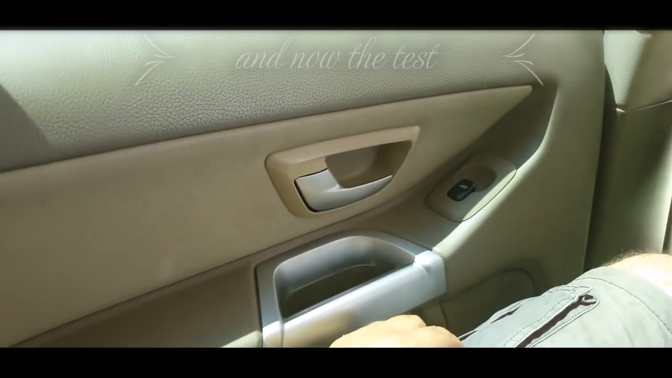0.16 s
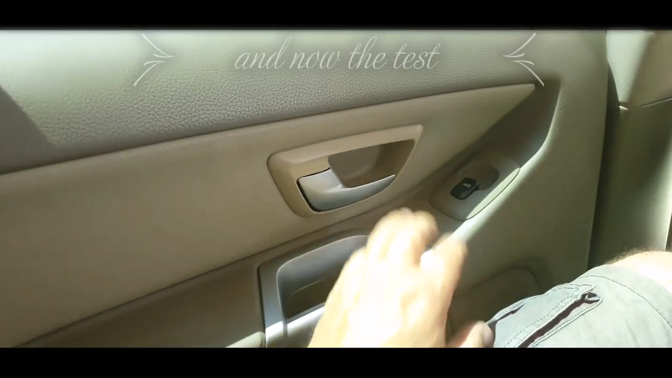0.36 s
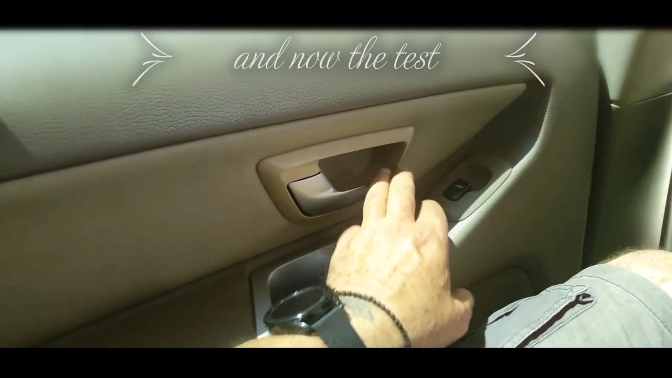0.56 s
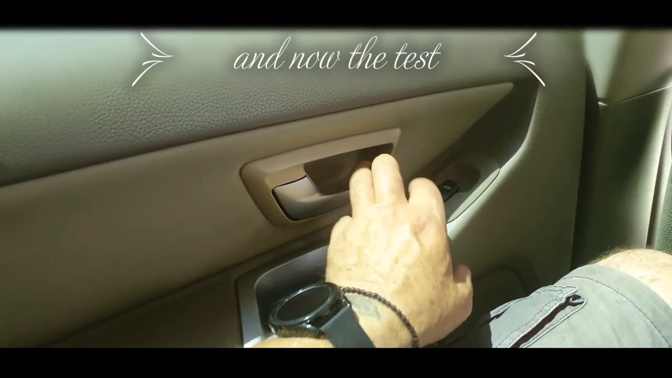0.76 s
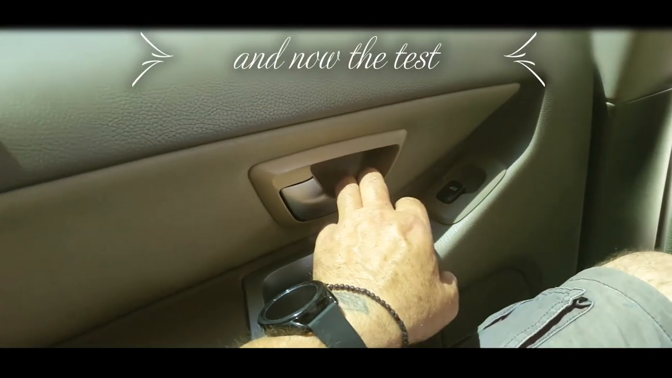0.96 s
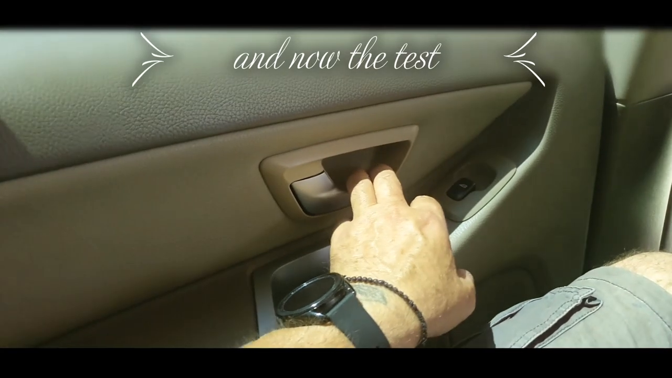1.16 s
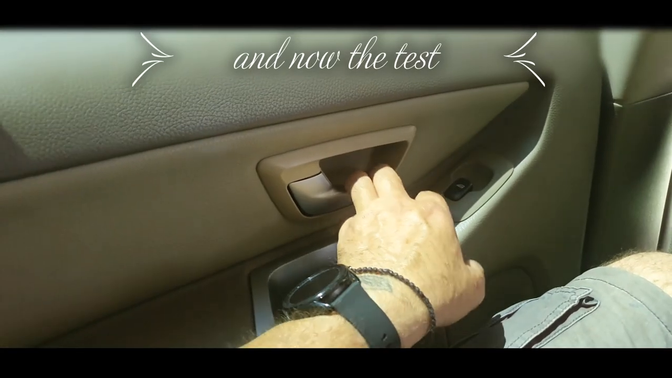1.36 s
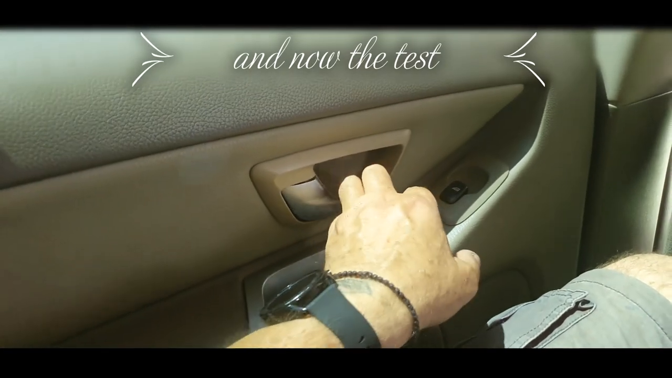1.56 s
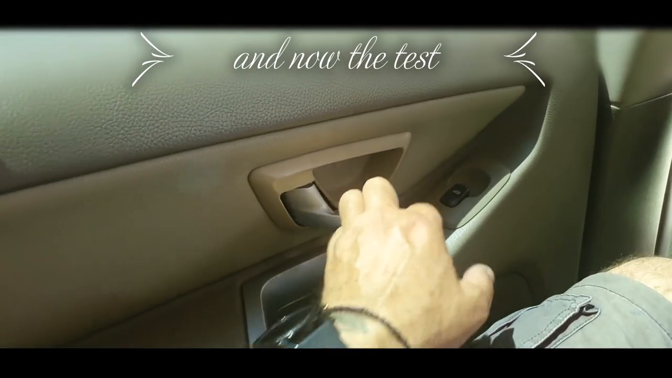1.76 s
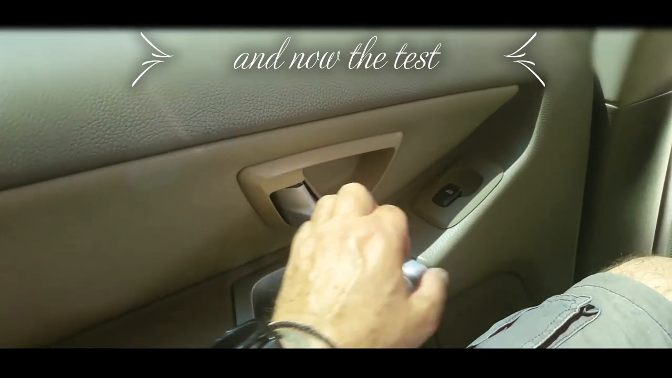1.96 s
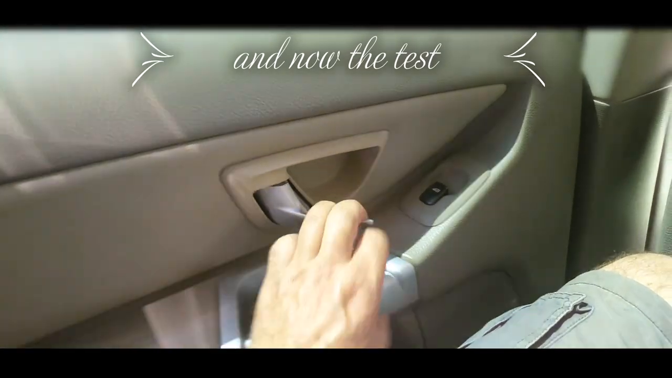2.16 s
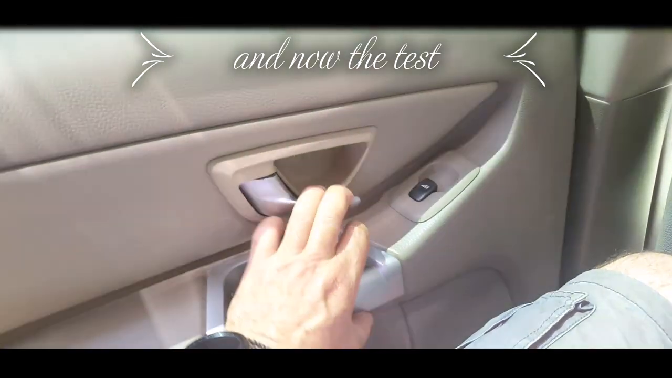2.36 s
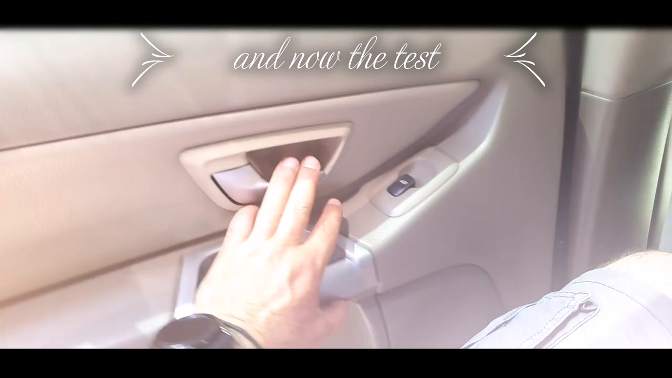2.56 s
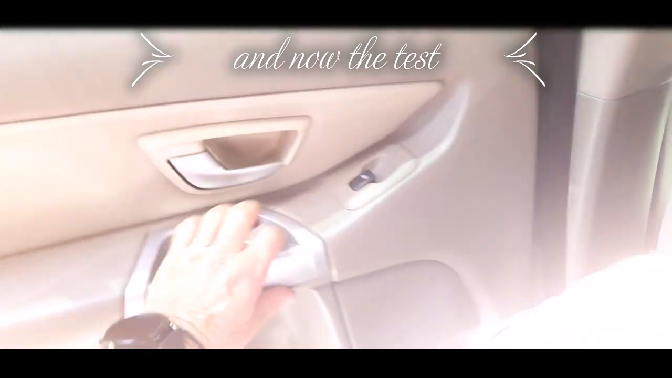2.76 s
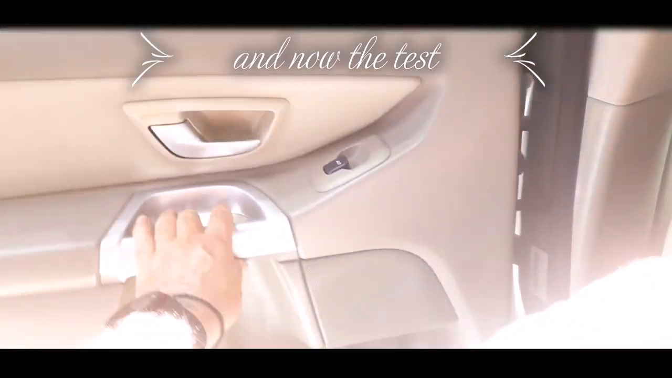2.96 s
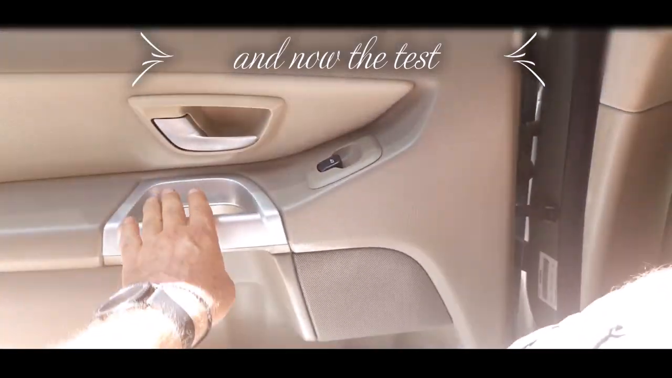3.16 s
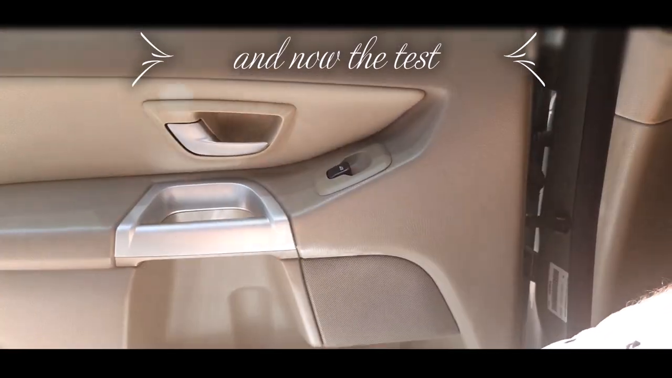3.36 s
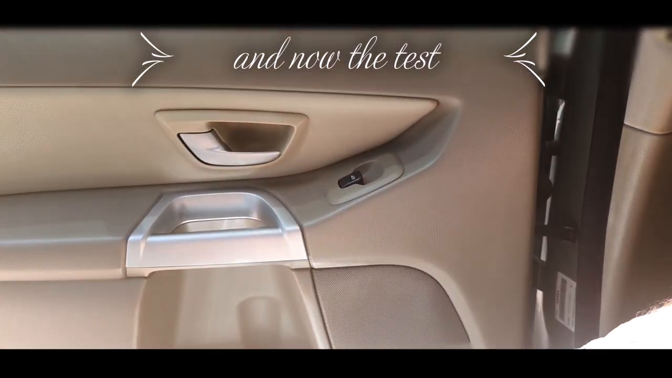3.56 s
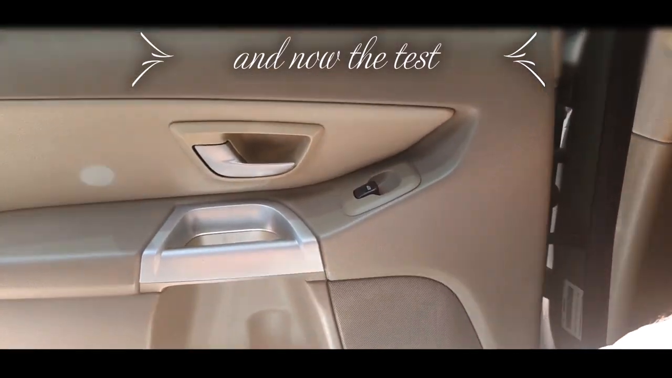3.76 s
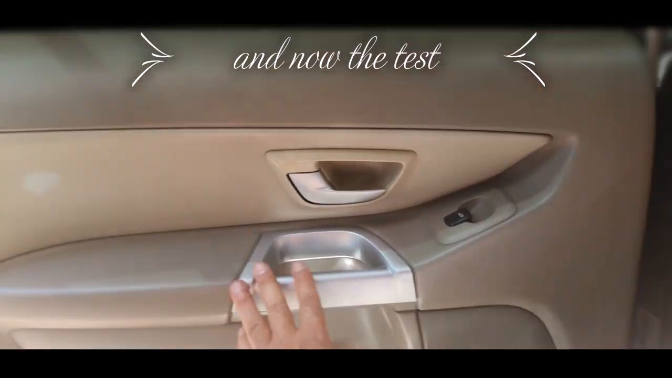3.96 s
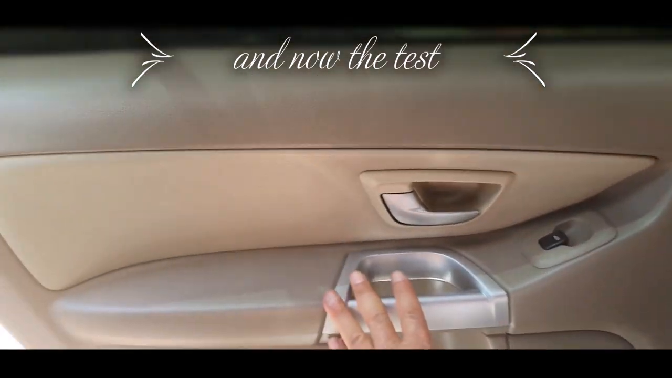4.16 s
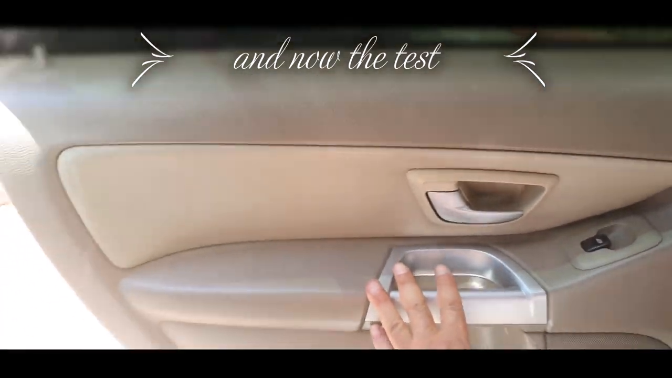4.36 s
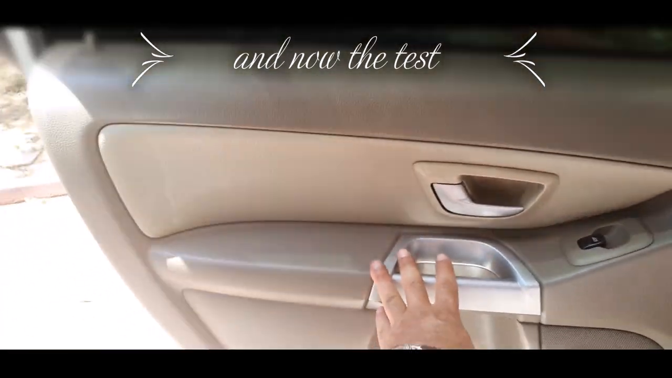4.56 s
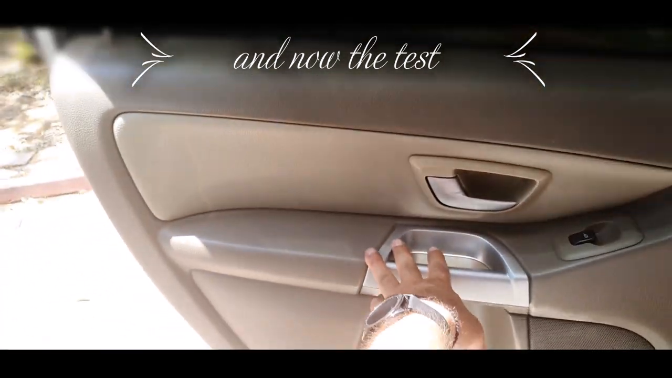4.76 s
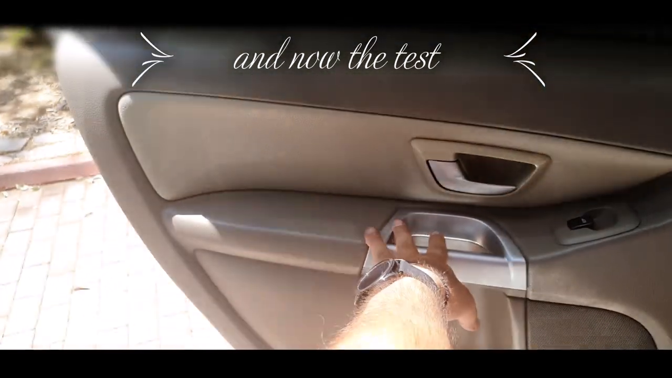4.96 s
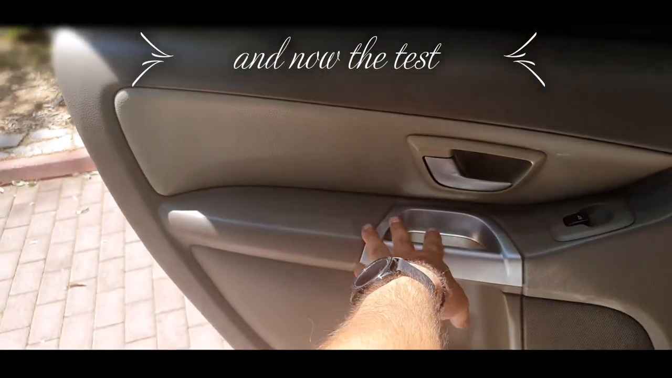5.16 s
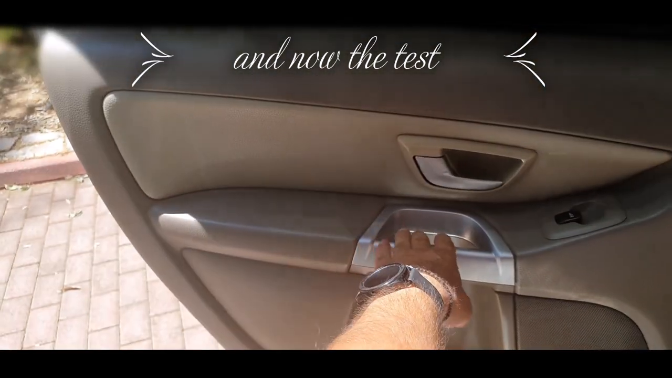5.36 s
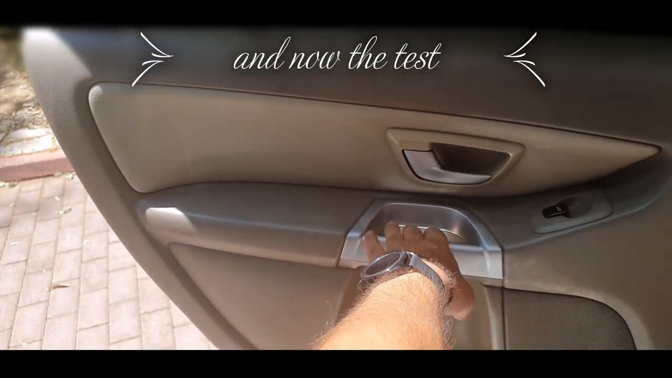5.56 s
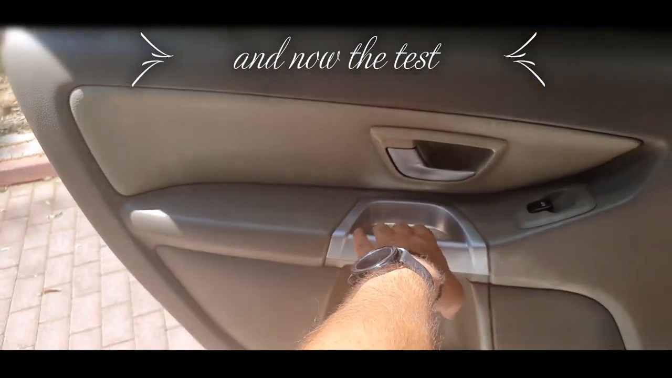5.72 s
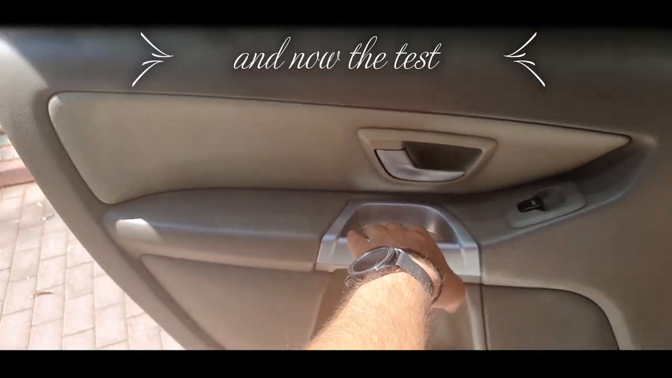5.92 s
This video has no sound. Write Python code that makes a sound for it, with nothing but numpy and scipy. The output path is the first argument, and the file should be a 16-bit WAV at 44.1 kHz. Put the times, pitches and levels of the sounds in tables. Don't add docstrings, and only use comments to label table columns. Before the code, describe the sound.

Close stereo microphones inside a quiet, padded parked car. Fingers tap the handle softly, then a burst of stiff plastic and metal clicks leads to a deep, loud latch thump. The handle snaps back with a clack and low knock; cloth and seal rustle. The door swings out, faint street air and distant cicadas seep in, a dull boom marks its stop, and a sharp bright clack ends it.

```python
import sys
import numpy as np
from scipy import signal
from scipy.io import wavfile
from scipy.ndimage import uniform_filter1d

SR = 44100
rng = np.random.default_rng(int(sys.argv[2]) if len(sys.argv) > 2 else 0)


def inscribe(sig):
    pcm = np.round(np.clip(np.atleast_2d(sig).T, -1, 1) * 32767)
    wavfile.write(sys.argv[1], SR, pcm.astype(np.int16))


def undo_db(level):
    steps = np.asarray(level, float) / 20
    return 10 ** steps


N = 268569

# frequency in Hz, left-right correlation from -1 to 1.
LIKENESS = [(60, 0.86), (150, 0.94), (380, 0.81), (950, 0.21), (2380, -0.052), (5980, 0.055), (15000, 0.2)]


def evened(x):
    return x / np.sqrt(np.mean(x ** 2) + 1e-20)


def read(points, hz):
    f, value = np.transpose(points)
    return np.interp(np.log(hz + 1), np.log(f + 1), value)


def add(mix, s, sound):
    part = mix[:, round(s * SR):][:, :sound.shape[1]]
    part += sound[:, :part.shape[1]]


def wash(spectrum, level_db, patchy_db, flicker_db, balance_db, size=512):
    hop = size // 4
    frames, hz = N // hop + 5, np.fft.rfftfreq(size, 1 / SR)
    a, b, c, d, patches = rng.standard_normal((frames, len(hz), 5)).T
    patches = uniform_filter1d(patches, size=6, axis=0)
    patches = evened(uniform_filter1d(patches, size=16, axis=1))
    flicker = evened(uniform_filter1d(rng.standard_normal(frames), size=6))
    same = np.clip(read(LIKENESS, hz), -1, 1)[:, None]
    left = a + 1j * b
    right = same * left + np.sqrt(1 - same ** 2) * (c + 1j * d)
    z = np.array([left, right])
    z *= undo_db(read(spectrum, hz)[:, None] + patchy_db * patches + flicker_db * flicker)
    x = signal.istft(z, nperseg=size, noverlap=size - hop)[1][:, :N]
    return x / np.std(x.mean(0)) * undo_db(level_db + balance_db * np.array([[.5], [-.5]]))


def door_opening():
    # time in seconds, opening from 0 shut to 1 wide.
    swing_path = [(0, 0.053), (1.7, 0), (2.0, 0.061), (2.24, 0.2), (2.56, 0.55), (2.88, 0.7), (3.26, 0.89),
                  (3.53, 1.08), (4.1, 1.07), (4.3, 0.89), (4.8, 0.99), (5.68, 0.99), (5.82, 1.06),
                  (6.09, 1.03)]
    return np.interp(np.arange(N) / SR, *np.transpose(swing_path))


def shaking():
    # start in seconds, hold in seconds, shake in dB, buzz in dB against the shake.
    jolts = [(0.262, 0.025, -74.5, 4), (0.552, 0.17, -51, -21), (1.358, 0.079, -57, -22),
             (1.49, 0.23, -43.5, -28), (1.605, 0.066, -61, 9), (1.759, 0.047, -36, -21),
             (2.224, 0.065, -52.5, -16), (2.334, 0.21, -55, -16), (2.382, 0.018, -60.5, 5),
             (2.828, 0.043, -52.5, -8.5), (3.326, 0.18, -62, -5), (3.84, 0.19, -58, -2.5),
             (4.05, 0.037, -53, -6), (4.614, 0.075, -49.5, -15.5), (5.303, 0.22, -49, -12),
             (5.6, .18, -56, 1), (4.393, 0.058, -55, -11.5), (5.0, .1, -55, -20), (5.9, .2, -53, -14),
             (0.758, 0.069, -66, -30), (1.0, 0.042, -81.5, 4.5)]
    rise_s, fall_db_per_s = 0.036, 129
    t, shake, buzz = np.arange(N) / SR, 0, 0
    for start, hold, db, buzz_db in jolts:
        since = t - start - rise_s
        fade = undo_db(db - fall_db_per_s * np.maximum(since - hold, 0))
        jolt = np.clip(1 + since / rise_s, 0, 1) * fade
        shake, buzz = np.hypot(shake, jolt), np.hypot(buzz, undo_db(buzz_db) * jolt)
    return shake, buzz


def rumble_and_street(opening):
    # frequency in Hz, level in dB per Hz.
    rumble_spectrum = [(12, -40), (20, -11.5), (81, 5.5), (118, -5), (155, 3.5), (204, -5.5), (226, -21.5),
                       (300, -20), (390, -57), (660, -120)]
    street_spectrum = [(130, -39), (220, -1.5), (393, 0.5), (528, -4), (590, -8.5), (1250, -10),
                       (1750, -12.5), (2000, -12), (2440, -10.5), (3530, -19), (4200, -22.5), (5460, -77),
                       (9240, -120)]
    shake, buzz = shaking()
    rumble = wash(rumble_spectrum, 0, patchy_db=1.5, flicker_db=1.0, balance_db=0.7, size=2048)
    street = wash(street_spectrum, 0, patchy_db=.9, flicker_db=.9, balance_db=-1.6, size=1024)
    rumble_gain = np.hypot(undo_db(-65.5 + 12 * opening), shake)
    street_gain = np.hypot(undo_db(-81 + 21.5 * opening), buzz)
    return rumble * rumble_gain + street * street_gain


def cicadas(opening):
    # frequency in Hz, level in dB per Hz.
    chorus_spectrum = [(2240, -43), (3800, -13.5), (3990, -17.5), (4510, -2.5), (4850, -0.5), (5800, -6),
                       (6370, -13), (7040, -12.5), (8000, -25.5), (10400, -42), (17600, -120)]
    return wash(chorus_spectrum, -83 + 20.5 * opening, patchy_db=.9, flicker_db=0.67, balance_db=3.7)


def cricket(opening):
    # frequency in Hz, level in dB per Hz.
    cricket_spectrum = [(2150, -60), (2380, -11), (2500, 0), (2620, -14), (2900, -60)]
    return wash(cricket_spectrum, -100 + 23 * opening, patchy_db=3.5, flicker_db=2.5, balance_db=0.6)


def hum(opening):
    # frequency in Hz, level in dB per Hz.
    hum_spectrum = [(400, -120), (480, -27.5), (515, -9), (545, 2), (580, -13.5), (640, -21), (800, -120)]
    return wash(hum_spectrum, -82 + 3 * opening, patchy_db=4, flicker_db=0.5, balance_db=4.5, size=2048)


def rustle(opening):
    # start in seconds, end in seconds, level in dB, rise in seconds, part under 8 kHz in dB.
    strokes = [(0.11, 0.29, -76, .11, 6), (0.303, .36, -84, .03, 4), (0.385, .43, -80, .011, 4.5),
               (1.575, 1.6, -80, .01, 6), (1.63, 1.72, -80, .01, 15.5), (2.19, 2.3, -67, .062, 1),
               (2.707, 2.738, -75, .003, 6), (2.724, 2.929, -65.5, .0044, -8),
               (2.724, 2.787, -72, .004, -20), (2.952, 3.06, -78, .017, -14),
               (3.343, 3.43, -72.5, 0.026, 10.5), (3.45, 3.534, -78, .02, 2), (3.623, 3.68, -74, .022, 12),
               (3.86, 3.93, -85, .02, -6), (3.945, 4.017, -60, .023, 1.5), (4.03, 4.13, -81, .01, 9),
               (5.234, 5.31, -73, .01, 0), (5.298, 5.35, -68, .03, -1), (5.44, 5.69, -76.5, 0.2, 16),
               (5.75, 5.82, -75.5, .01, 16)]
    # frequency in Hz, level in dB per Hz.
    hiss_spectrum = [(7400, -88.5), (8000, -19), (8600, -12), (10500, -1), (12500, -1), (14500, 0),
                     (15500, -2), (15950, -88)]
    air_spectrum = [(4470, -28.5), (7600, -7.5), (9090, -6), (11300, -6.5), (12100, -5.5), (13100, -12),
                    (15700, -26)]
    scuff_spectrum = [(200, -53), (600, 5), (2000, 0), (4000, -2), (7300, -5), (7900, -27), (8400, -78)]
    floor_db = -92.5 + 11 * opening
    t, bright, dull = np.arange(N) / SR, 0, undo_db(floor_db + 2.5)
    for start, end, db, rise, dull_db in strokes:
        fall = 0.029 * undo_db(.8 * max(-68 - db, 0))
        angle = np.interp(t, [start, start + rise, end, end + fall], [0, np.pi / 2, np.pi / 2, 0])
        stroke = undo_db(db) * np.sin(angle) ** 1.5
        bright, dull = bright + stroke, dull + undo_db(dull_db) * stroke
    hiss = wash(hiss_spectrum, 0, patchy_db=2.5, flicker_db=1.5, balance_db=2.5)
    air = wash(air_spectrum, 0, patchy_db=.9, flicker_db=.9, balance_db=7.5)
    scuff = wash(scuff_spectrum, 0, patchy_db=1.5, flicker_db=1.0, balance_db=-0.5, size=256)
    return air * (undo_db(floor_db) + undo_db(-15) * bright) + bright * hiss + dull * scuff


def rise_of(hz):
    return 0.0054 * (100 / hz) ** 0.32


def blow(hz, db, t60, rise, swing, lag=0.18):
    t = np.arange(round(.6 * SR)) / SR
    pace = 50 * max(hz / 200, 1) ** .6
    loose = np.minimum(t * pace / 3, 1) ** 2 * min(hz / 260, 1)
    drift = rng.standard_normal((300, 2))
    swell, slip = (np.interp(t * pace, np.arange(300), d) * loose for d in drift.T)
    shape = undo_db(db - 60 * t / t60 + 4 * swell) * (1 - np.exp(-(t / rise) ** 2))
    delay = np.array([[0], [lag]]) * max(hz / 200, 1)
    turn = 2 * np.pi * hz * t + 1.45 * slip - delay
    return np.sign(swing) * shape * np.sin(turn) * undo_db(np.array([[.7], [-.7]]))


def knocked(table, lag=.2, quick=1):
    out = np.zeros((2, N))
    for s, part, db, hard_db in table:
        for hz, mode_db, t60 in part:
            level_db = db + mode_db + hard_db * np.log2(hz / 400)
            add(out, s, blow(hz, level_db, t60, quick * rise_of(hz), 1, lag))
    return out


def knocks():
    # frequency in Hz, level in dB, t60 in seconds.
    HANDLE = [(155.4, -5, 0.17), (266.5, -0.5, 0.102), (396, -10, 0.095), (1060, -36, 0.24),
              (1710, -28, 0.23), (3540, -31, .14)]
    LEVER = [(648, -0.5, 0.06), (1440, -10.5, 0.11), (1930, -8, 0.068), (2250, -21, .069)]
    ARMREST = [(81.8, 0, 0.35), (117.2, -2, .16), (165, 1, .12), (373, -18, .11), (472, -19, .13)]
    FRAME = [(88, 1.5, 0.25), (573, -18, 0.15), (801, -3.5, 0.081), (1226, -6.5, 0.063)]
    CHECK_STRAP = [(181, -3, 0.2), (273, -3, 0.1), (324, -12, 0.17), (362.5, -1, 0.12), (523, -19, 0.26),
                   (640, -18, 0.18)]
    GRIP = [(384.7, 1, 0.083), (500, -1, .088), (994, -14.5, 0.073), (1520, -15, 0.041),
            (3940, -5.5, 0.056)]
    SPRING = [(1350, 0, 0.11)]
    ROD = [(2097, -0.5, .1), (2600, -8, .06)]
    # start in seconds, part struck, level in dB, hardness in dB per octave.
    knock_events = [(.599, HANDLE, -30.5, 0.5), (.736, HANDLE, -43, 4), (1.552, LEVER, -29.5, -3),
                    (1.57, LEVER, -26.5, 2.0), (1.8, GRIP, -44, -6), (1.875, SPRING, -52, 0.5),
                    (2.338, LEVER, -42, -1), (2.438, ARMREST, -18, 0), (2.587, FRAME, -49, 3),
                    (2.727, FRAME, -40.5, -0.5), (2.874, FRAME, -43.5, -1), (3.953, CHECK_STRAP, -26, -0.5),
                    (4.012, CHECK_STRAP, -37, -4), (5.7245, GRIP, -19.5, 0), (5.7685, GRIP, -44, -2.5),
                    (.232, ROD, -56, 0), (1.515, LEVER, -38, -6), (1.735, ROD, -36.5, -0.5),
                    (2.304, ROD, -40, -0.5), (5.726, ROD, -28, -1), (1.826, ROD, -54, -1)]
    return knocked(knock_events)


def booms():
    # start in seconds, frequency in Hz, level in dB, t60 in seconds, first swing (1 out, -1 in).
    boom_events = [(.535, 112, -46, .24, 1), (.595, 85, -36.5, 0.59, 1), (1.51, 83.4, -38, .99, 1),
                   (1.828, 67, -15, .13, 1), (1.86, 73.6, -24, 0.25, 1), (1.999, 60.4, -33, 0.15, 1),
                   (2.209, 64.6, -44, 0.52, 1), (3.939, 80.6, -17, 0.14, 1), (3.957, 115, -9.5, 0.09, 1),
                   (3.986, 56.5, -25.5, 0.26, 1), (4.01, 78.4, -12, .1, -1), (4.032, 42.3, -23, 0.22, 1),
                   (3.945, 45, -22.5, 0.28, 1), (4.08, 64, -24, 0.17, -1), (4.113, 54, -28, .11, 1),
                   (5.323, 88, -39.5, 0.17, 1), (1.561, 87, -27.5, .25, 1)]
    out = np.zeros((2, N))
    for s, hz, db, t60, swing in boom_events:
        add(out, s, blow(hz, db, t60, rise_of(hz), swing))
    return out


def click(peak_db, body_db, edge_db, ring, part_hz, count=140):
    # frequency in Hz, level of a mode in dB.
    trim_db = [(250, 5), (450, 9), (700, 9), (1000, 2), (1600, 2), (2500, 2), (4000, 2), (6500, 5.5),
               (7800, -1), (9000, 0), (15800, -0.5)]
    # frequency in Hz, t60 in seconds.
    ring_times = [(250, 0.15), (700, 0.11), (2000, 0.083), (5000, 0.068), (15000, 0.045)]
    # frequency in Hz, left over right in dB.
    lean_db = [(60, 1.0), (150, 1), (380, 0.5), (950, 1.5), (2380, -4), (5980, 7), (15000, 0)]
    place, phase, skew = rng.random((count, 3)).T
    hz = 250 + 15550 * ((np.arange(count) + place) / count) ** 1.9
    tilt = [(600, body_db), (1100, 0), (2600, 0.24 * (edge_db + 22)), (11000, edge_db + 7)]
    colour_db = read(trim_db, hz) + read(tilt, hz)
    colour_db += 4.2 * np.exp(-(np.log2(hz / part_hz) / 0.25) ** 2)
    t = np.arange(round(.11 * SR)) / SR
    pole = 2j * np.pi * hz - np.log(1000) / (max(ring, .2) * read(ring_times, hz))
    speed = 55 * undo_db(0.22 * (edge_db + 18.0)) * np.sqrt(hz)[:, None]
    rise = (1 - np.exp(-t * speed)) ** 2
    apart = np.sqrt(1 - np.clip(read(LIKENESS, hz), 0, 1))
    phases = 2 * np.pi * np.array([0.73 * phase, 0.64 * phase + apart * (skew - .5)])
    gains = undo_db(peak_db - 17.5 + colour_db + read(lean_db, hz) * np.array([[.5], [-.5]]))
    return ((gains * np.exp(1j * phases)) @ (np.exp(pole[:, None] * t) * rise)).imag


def door_clicks():
    # start in seconds, peak in dB, weight in dB, edge in dB.
    FINGERS = [(.5364, -73, 7, -11), (.5971, -56, 12.5, -27), (.7278, -60, -5, -21),
               (.7368, -57.5, -1.5, -18), (2.0562, -66.5, 11, -30.5), (2.1741, -52, -2, -31)]
    LINKAGE = [(1.476, -56, -6, -12), (1.4823, -47, -11, -10), (1.487, -30.5, -4, -24),
               (1.5049, -36.5, 4, -14.5), (1.515, -29.5, -34, -16), (1.5429, -32, -7, -32),
               (1.5502, -28.5, -6.5, -22), (1.5697, -23, -9.5, -41), (1.578, -39.5, 0, -28),
               (1.6176, -30.5, -14, -23.5), (1.6286, -35, -3.5, -19.5)]
    PAWL = [(1.7283, -31, 0, -33), (1.732, -25, -5, -15.5), (1.7454, -29.5, 3, -34),
            (1.7653, -30.5, -22, -33), (1.7827, -41.5, -13, -12.5), (1.7994, -62, 4, -27),
            (1.8262, -51, -5.5, -27)]
    SNAP_BACK = [(2.2751, -53.5, 3.5, -22), (2.3036, -28, -10.5, -25), (2.3378, -32.5, -2, -23.5),
                 (2.4252, -41, -1, -18), (2.4161, -39, -3, -36), (2.4356, -25.5, -0.5, -32),
                 (2.4405, -26, -5, -23)]
    SEAL = [(2.5781, -56, 2, -40), (2.591, -45, -1, -45), (2.6018, -49, -18, -31), (2.6428, -55, -3, -38),
            (2.6991, -50.5, -9, -19), (2.7255, -49.5, 1.5, -32), (2.8745, -50.5, 6, -21),
            (3.9437, -43.5, 5, -25), (4.4734, -55.5, 6, -27), (5.2258, -52, -4.5, -16)]
    STUD = [(5.7237, -17.5, -13.5, -17.5), (1.5152, -31, -18, -16)]
    CLASP = [(5.7236, -21.5, -14, -11.5), (5.7684, -35, -3, -43), (5.7935, -41, -33, -29)]
    # clicks of the part, ring factor, strongest ring in Hz.
    clicking_parts = [(FINGERS, 0.73, 1460), (LINKAGE, 0.64, 1900), (PAWL, 0.76, 1950),
                      (SNAP_BACK, 0.67, 1560), (SEAL, 0.71, 1230), (CLASP, 0.51, 2000), (STUD, 0.6, 3600)]
    out = np.zeros((2, N))
    for rows, ring, part_hz in clicking_parts:
        for s, db, body_db, edge_db in rows:
            damped = ring * undo_db(-0.1675 * (db + 31.5))
            add(out, s, click(db, body_db, edge_db, damped, part_hz))
    return out


def cabin(x):
    taps = rng.choice([-1., 1.], (3, 9000)) * (rng.random((3, 9000)) < .05)
    t = np.arange(9000) / SR
    dull = signal.lfilter([.1], [1, -.9], taps[2] + 0.39 * taps[:2])
    tail = dull * undo_db(-60 * t / 0.18) + 0.6 * taps[:2] * undo_db(-60 * t / 0.098)
    tail = tail * (t > .003)
    return signal.fftconvolve(x, tail / np.linalg.norm(tail[0]), axes=1)[:, :N]


def rattles():
    # frequency in Hz, level in dB, t60 in seconds.
    STRIKER = [(457, -3, .13), (574, -5.5, .16), (734, -8, .1), (950, -14, 0.14), (1179, -19.5, .12),
               (1335, -16.5, 0.085), (1475, -23.5, .14), (2100, -11, .06), (3020, -16, .05)]
    SKIN = [(257, -5, 0.16), (382, -3, .14), (454, -11, .11), (664, -8, .07), (834, -4.5, .07),
            (1100, -12, 0.055), (1490, -13, .06), (2132, -17, 0.083), (2433, -17, .07), (3085, -19, .06),
            (3381, -24, 0.069)]
    CATCH = [(690, -4.5, 0.047), (1312, -2, 0.046), (1620, -5, .04), (1944, -7, .07), (2124, -1, 0.03),
             (3200, -19.5, 0.069)]
    HOOK = [(431, -5, 0.087), (738, -8, .06), (1810, 0, 0.028), (2020, -3, .035), (2300, -2.5, 0.033),
            (2710, -6, 0.046), (6380, -11, .025)]
    CABLE = [(631, -0.5, 0.077), (2500, -4, .045), (2890, -4, .05), (3540, -8, .05), (4080, -11, .04),
             (5450, -9, .04)]
    POCKET = [(341, -4.5, 0.11), (452, 0, 0.055), (604, -2, 0.072), (900, -3.5, 0.055), (1305, -7, .045),
              (1717, -12, .05)]
    TAB = [(301, -3, 0.095), (446, -3, .07), (790, 0, .06), (1157, -5.5, 0.04), (1800, -9, .03)]
    PIN = [(1900, 0, .025), (2310, -4, .022)]
    BEZEL = [(643, 1, .14), (1715, -1.5, 0.15), (3300, -4, .07), (3544, -2.5, .08)]
    # start in seconds, part, level in dB, hardness in dB per octave.
    rattle_events = [(1.487, CATCH, -37, 0), (1.5147, CABLE, -32.5, 1), (1.55, CABLE, -34, 0),
                     (1.569, CATCH, -28, 0), (1.576, CATCH, -31, -1), (1.6178, CABLE, -35, 1),
                     (1.629, CABLE, -43, 1), (1.733, STRIKER, -22, 1), (1.766, STRIKER, -36.5, 3),
                     (1.8265, PIN, -41.5, 0), (2.174, TAB, -57, 1), (2.274, TAB, -56, 1),
                     (2.304, HOOK, -33, 0.5), (2.312, HOOK, -36, -0.5), (2.338, CABLE, -38, -0.5),
                     (2.417, TAB, -36, 0), (2.425, CABLE, -43, -0.5), (2.4395, SKIN, -26, 0),
                     (2.452, SKIN, -36, 2.5), (2.578, TAB, -47, -1), (2.592, TAB, -44, 0),
                     (2.642, TAB, -52.5, -0.5), (2.725, TAB, -43.5, 1), (2.876, TAB, -39.5, -1.5),
                     (3.943, TAB, -46, 0), (5.7695, POCKET, -27.5, 0), (5.794, PIN, -42, 0.5),
                     (5.7245, PIN, -28, -0.5), (.598, BEZEL, -57, 0), (.737, BEZEL, -58, 0)]
    return knocked(rattle_events, lag=0.081, quick=0.33)


def ticks():
    # start in seconds, peak in dB, frequency in Hz, t60 in seconds.
    tick_events = [(1.488, -27, 2200, .02), (1.516, -26, 5500, .012), (1.552, -31, 3300, .015),
                   (1.57, -36, 6000, .02), (1.6185, -27, 3000, .01), (1.629, -40, 9000, .015),
                   (1.733, -32, 12000, .02), (1.767, -40, 6000, .015), (1.8275, -44, 2100, .012),
                   (2.305, -16, 2100, .016), (2.338, -27, 2400, .012), (2.436, -22, 1600, .016),
                   (2.876, -33, 700, .02), (5.7235, -22, 12500, .025), (5.7235, -19, 5800, .035),
                   (5.707, -48, 600, .04), (5.784, -36, 600, .03), (.737, -50, 1710, .06),
                   (1.581, -30, 1500, .03), (2.648, -54, 800, .05), (2.32, -38, 400, .05),
                   (1.735, -18, 350, .05), (2.44, -26, 200, .05), (2.728, -40, 1200, .02)]
    out, t = np.zeros((2, N)), np.arange(2000) / SR
    for s, db, hz, t60 in tick_events:
        spread = rng.standard_normal((8, 2))
        mode_hz = np.minimum(hz * 2 ** (.35 * spread[:, :1]), 15500)
        turn = 2 * np.pi * mode_hz * t
        skew = .8 * spread[:, 1:] * min(hz / 2000, 1)
        pair = np.array([np.sin(turn).mean(0), np.sin(turn + skew).mean(0)])
        add(out, s, pair * undo_db(db - 60 * t / t60) * np.minimum(t / .0003, 1))
    return out


def rebounds():
    # frequency in Hz, level in dB, t60 in seconds.
    DOOR = [(58, -4, .2), (80, 0, .2), (106, 0, .18), (128, -4, .12), (160, -4, .1), (205, -10, .12)]
    # start in seconds, part, level in dB, hardness in dB per octave.
    rebound_events = [(1.757, DOOR, -23, -3), (1.792, DOOR, -34, 1), (1.893, DOOR, -34, 1),
                      (2.48, DOOR, -27, -1), (2.5, DOOR, -31, -1), (2.53, DOOR, -44, -1),
                      (3.98, DOOR, -27, 1), (4.002, DOOR, -36, 3), (4.115, DOOR, -36, -3),
                      (.74, DOOR, -48, 1)]
    return knocked(rebound_events)


def thump():
    # start in seconds, frequency in Hz, level in dB, t60 in seconds, rise in seconds.
    thump_modes = [(1.724, 83, -19, 0.35, 0.0061), (1.727, 81.2, 8, 0.08, 0.0092),
                   (1.726, 104, -2.5, 0.2, 0.0058), (1.7246, 169.7, -3, 0.093, 0.011),
                   (1.7298, 273.3, -23.5, 0.2, 0.004), (1.7393, 100.4, 6, 0.059, 0.0024),
                   (1.7336, 320, -16, 0.083, 0.0012)]
    out = np.zeros((2, N))
    for s, hz, db, t60, rise in thump_modes:
        add(out, s, blow(hz, db, t60, rise, -1))
    return out


def scene():
    opening = door_opening()
    beds = rumble_and_street(opening) + cicadas(opening) + cricket(opening) + hum(opening)
    clicks = door_clicks()
    clicks = clicks + undo_db(-14.5) * cabin(clicks)
    blows = knocks() + booms() + rattles() + ticks() + rebounds() + thump()
    return beds + rustle(opening) + clicks + blows


def roll_off(x):
    return signal.sosfilt(signal.butter(12, 16980, fs=SR, output="sos"), x)


def record(dry):
    dry = dry + undo_db(-87.5) * rng.standard_normal(dry.shape)
    band_limit = signal.firwin(301, 15760, window=("kaiser", 5), fs=SR)
    dry = signal.oaconvolve(dry, band_limit[None], "same")
    return roll_off(1.325 * np.tanh(dry / 1.41))


dry = scene()
out = record(dry)
inscribe(out)
```